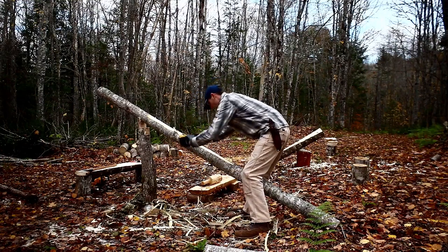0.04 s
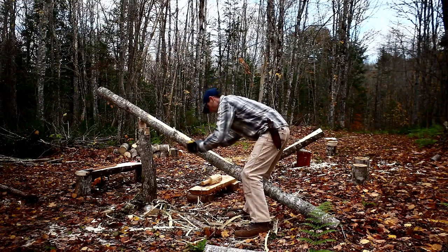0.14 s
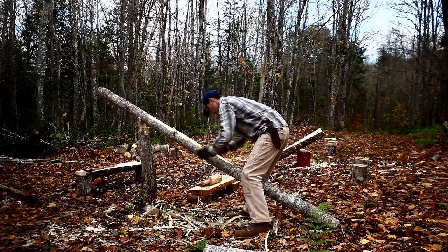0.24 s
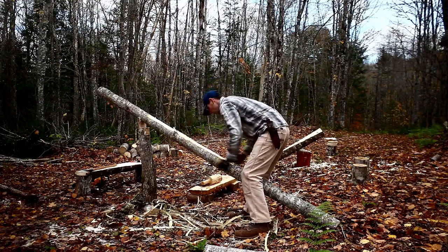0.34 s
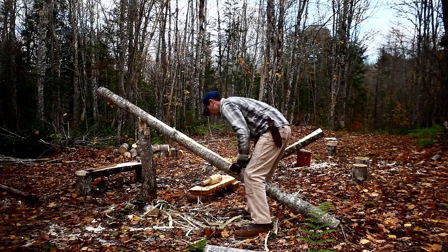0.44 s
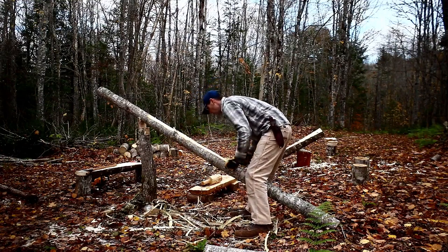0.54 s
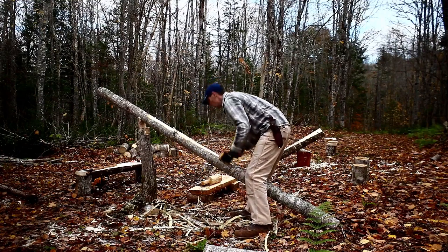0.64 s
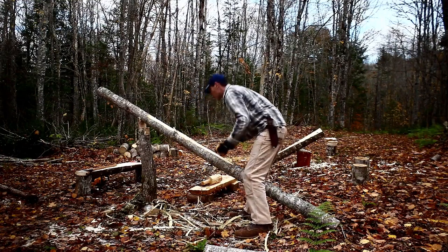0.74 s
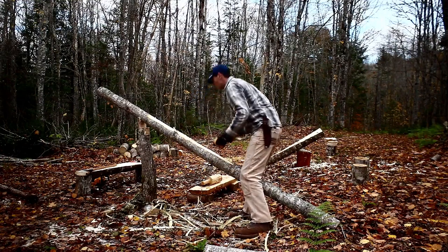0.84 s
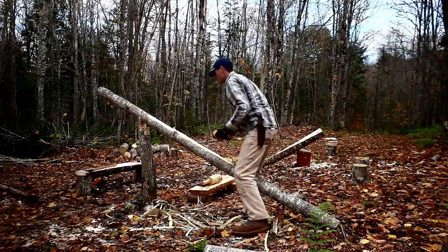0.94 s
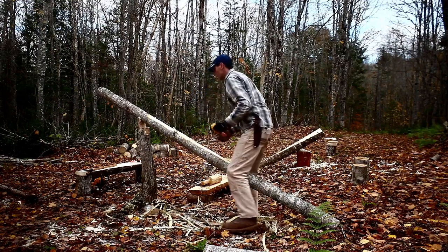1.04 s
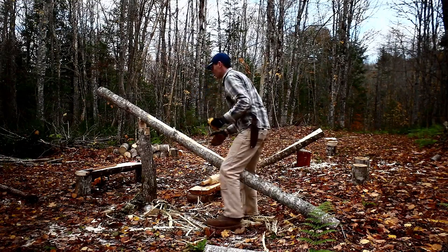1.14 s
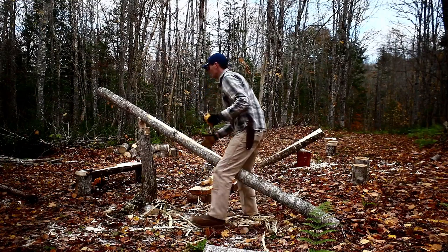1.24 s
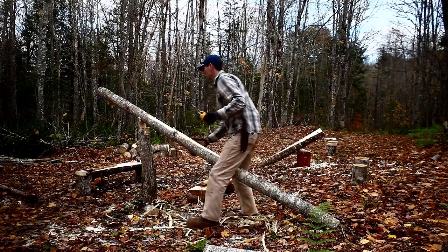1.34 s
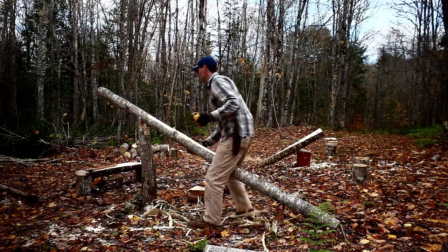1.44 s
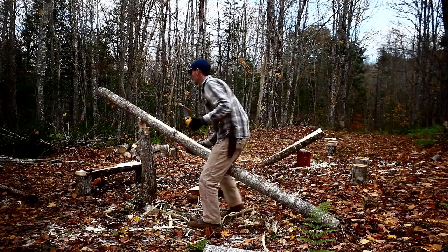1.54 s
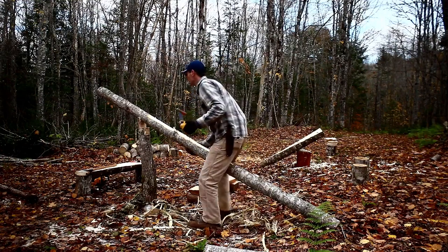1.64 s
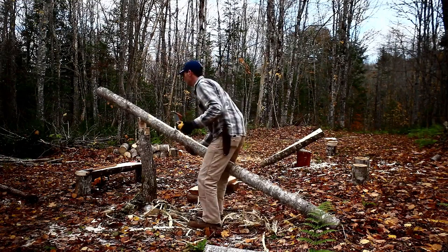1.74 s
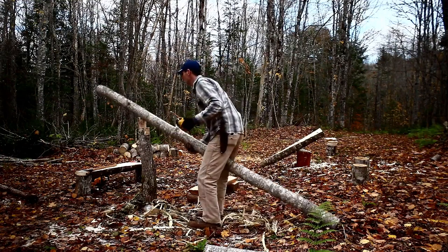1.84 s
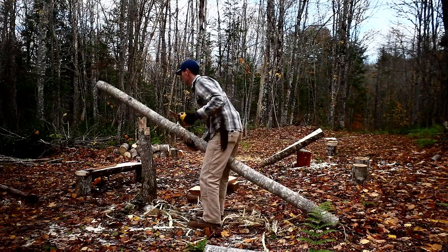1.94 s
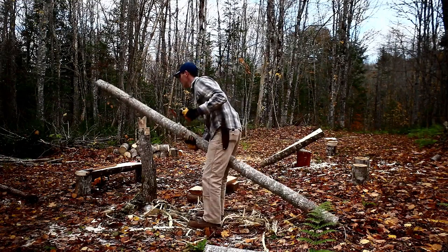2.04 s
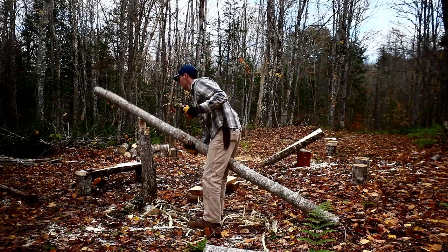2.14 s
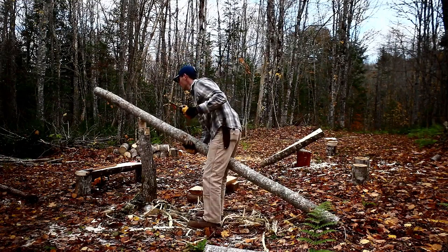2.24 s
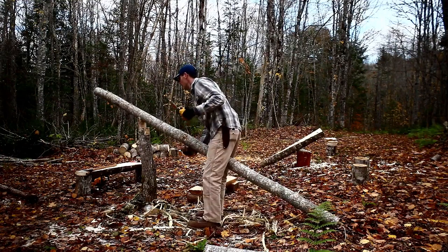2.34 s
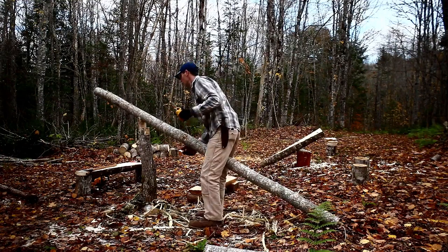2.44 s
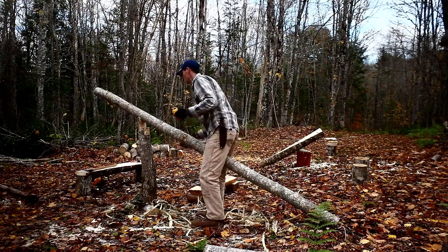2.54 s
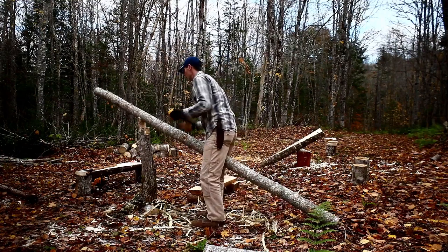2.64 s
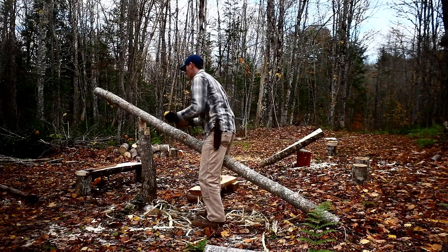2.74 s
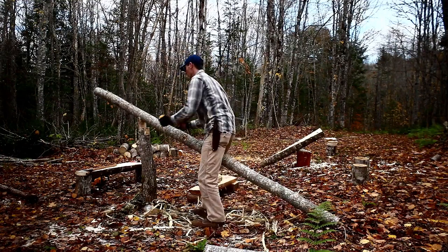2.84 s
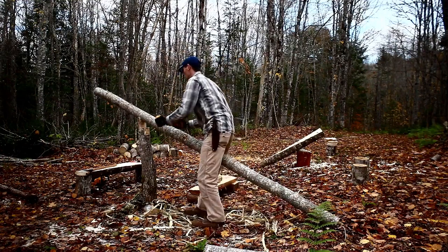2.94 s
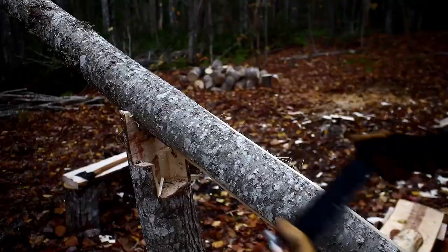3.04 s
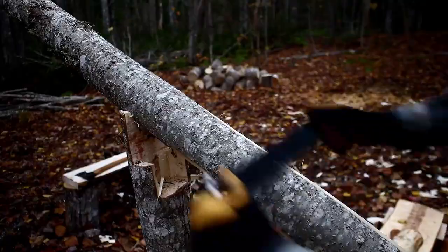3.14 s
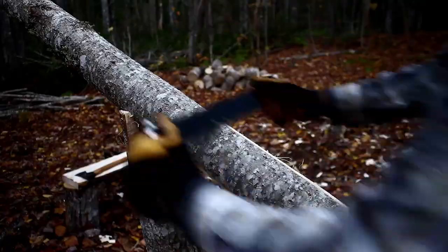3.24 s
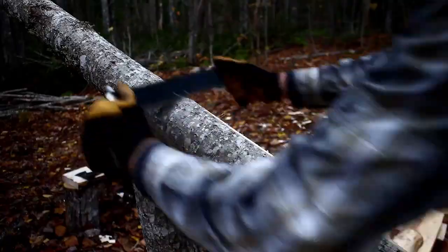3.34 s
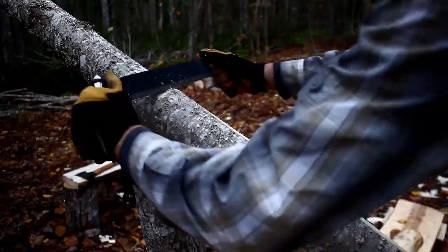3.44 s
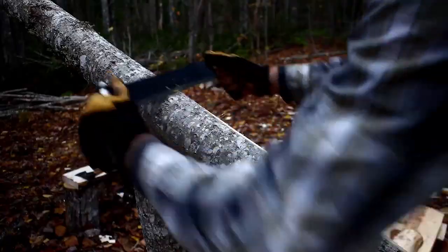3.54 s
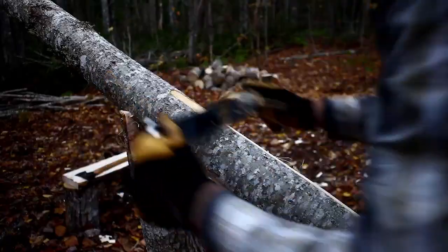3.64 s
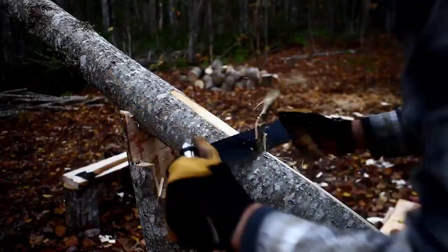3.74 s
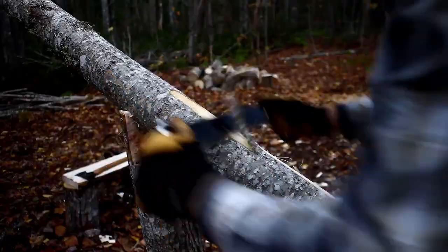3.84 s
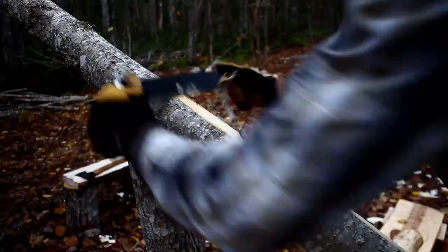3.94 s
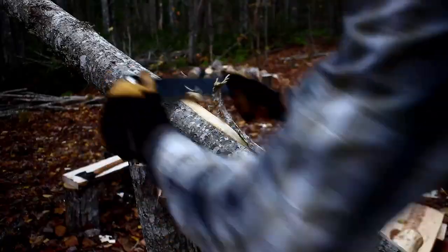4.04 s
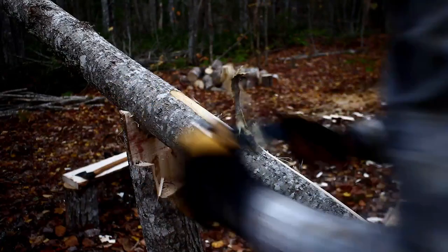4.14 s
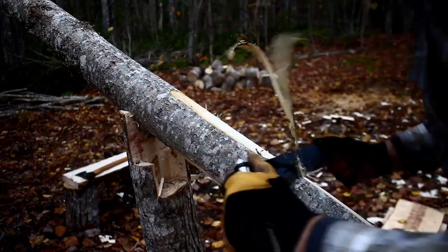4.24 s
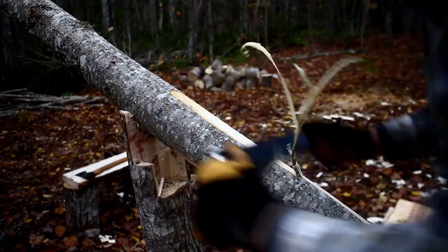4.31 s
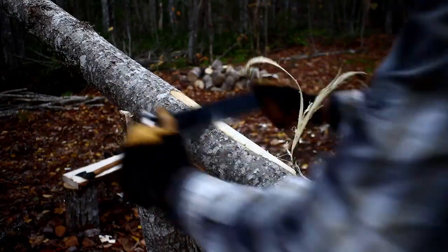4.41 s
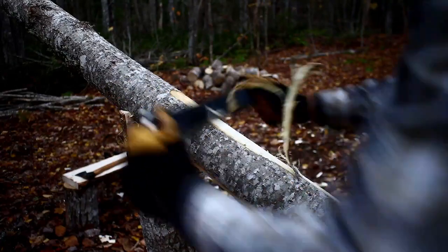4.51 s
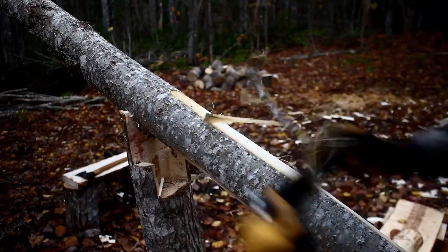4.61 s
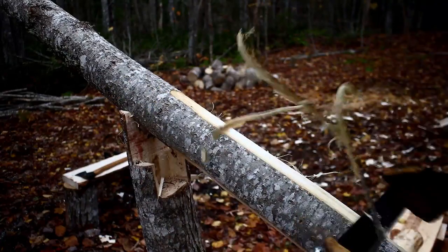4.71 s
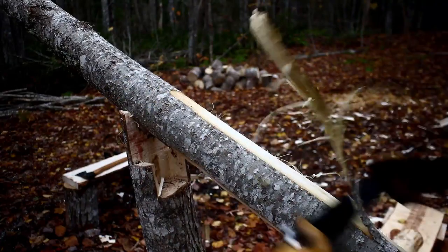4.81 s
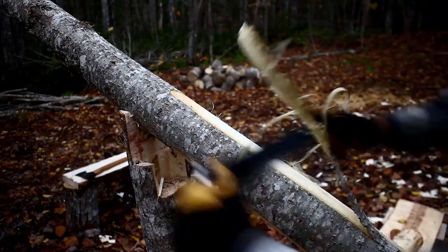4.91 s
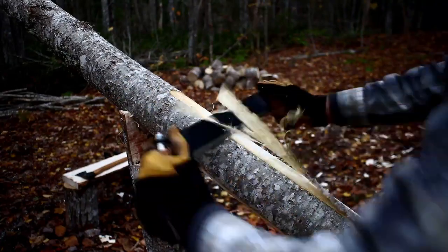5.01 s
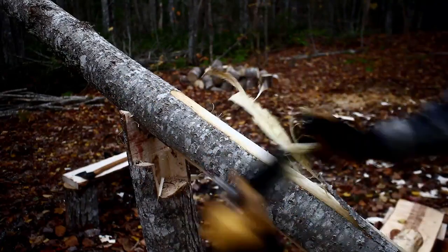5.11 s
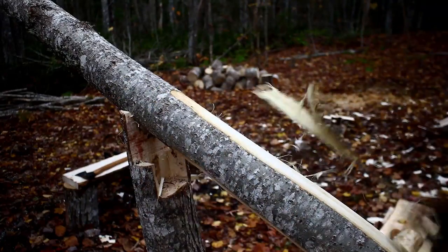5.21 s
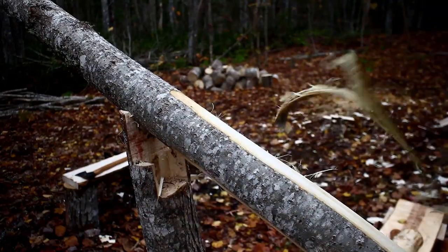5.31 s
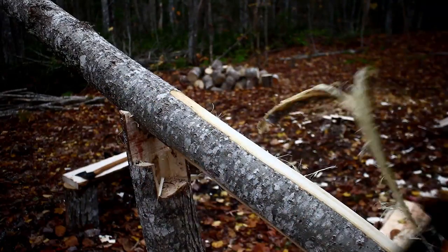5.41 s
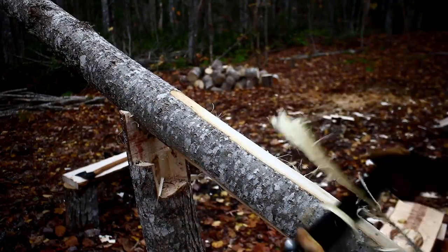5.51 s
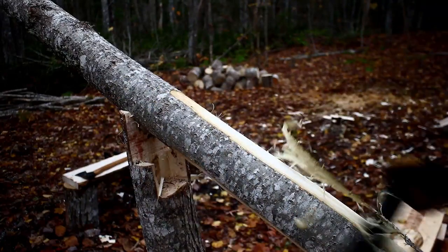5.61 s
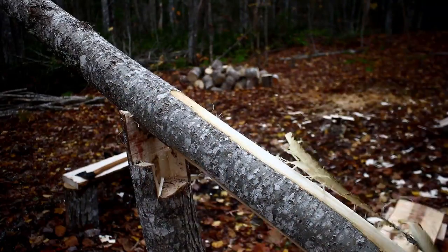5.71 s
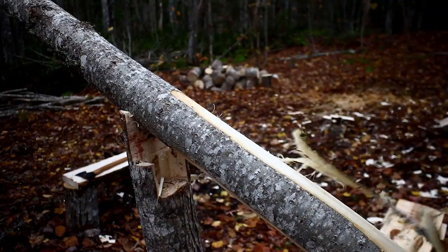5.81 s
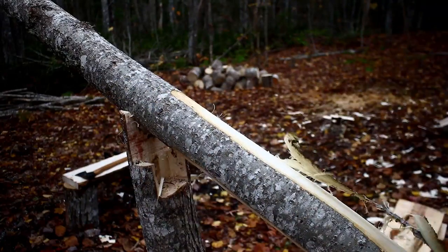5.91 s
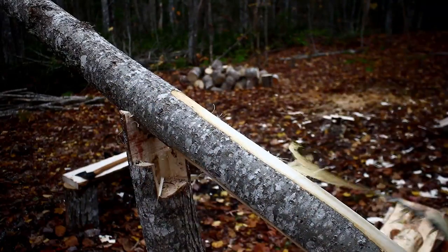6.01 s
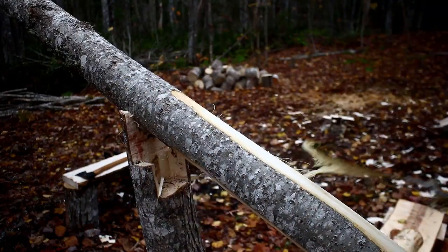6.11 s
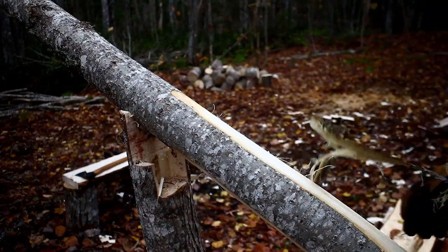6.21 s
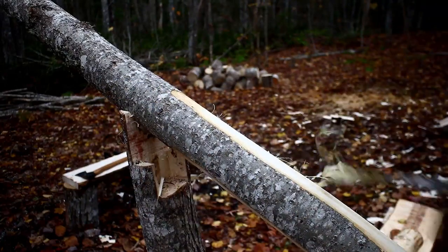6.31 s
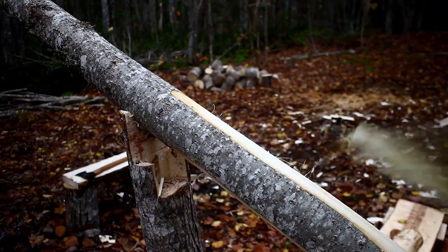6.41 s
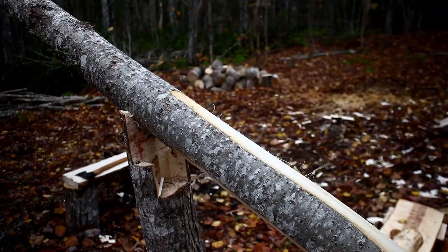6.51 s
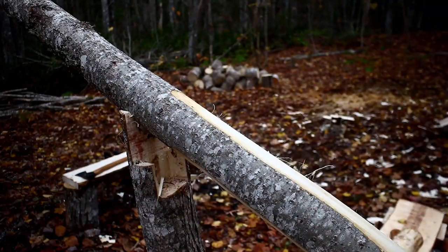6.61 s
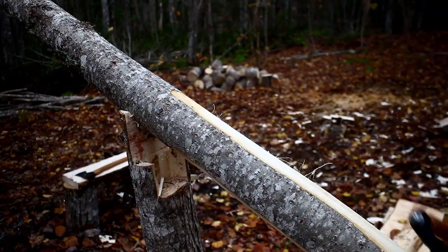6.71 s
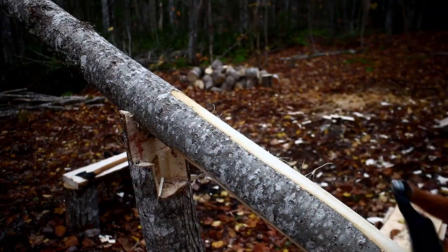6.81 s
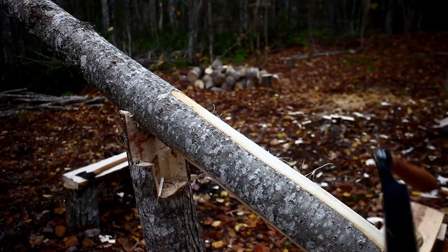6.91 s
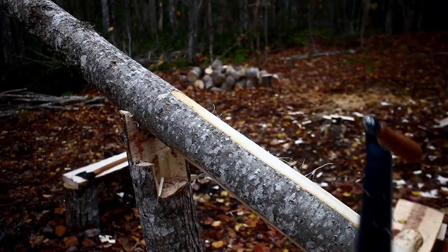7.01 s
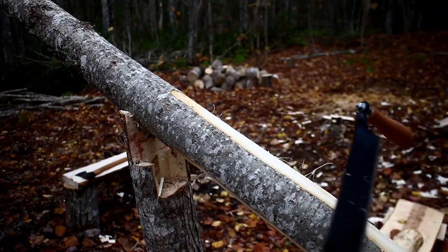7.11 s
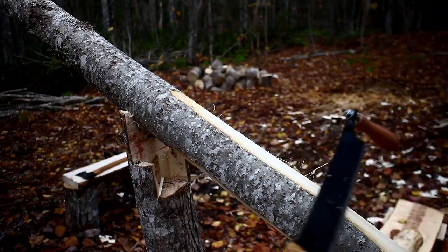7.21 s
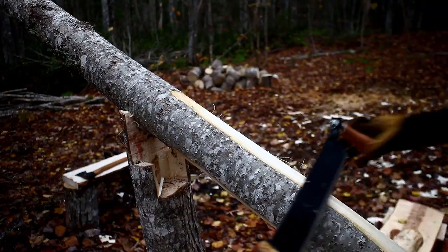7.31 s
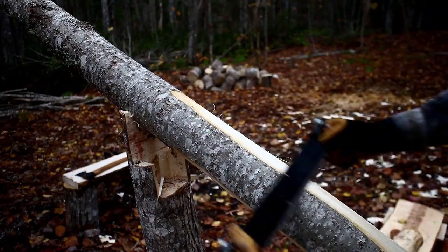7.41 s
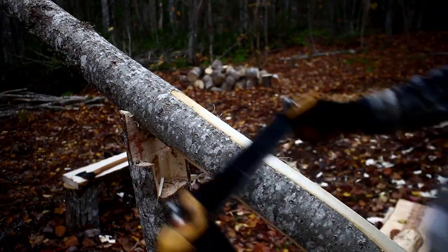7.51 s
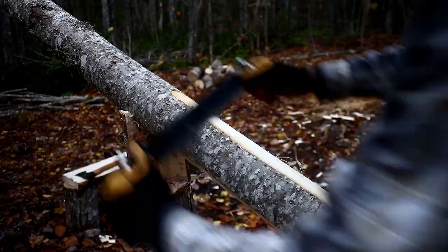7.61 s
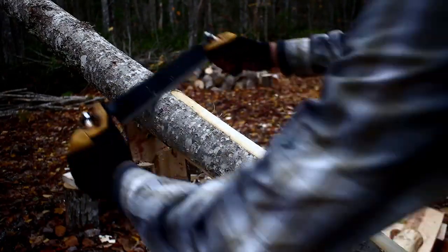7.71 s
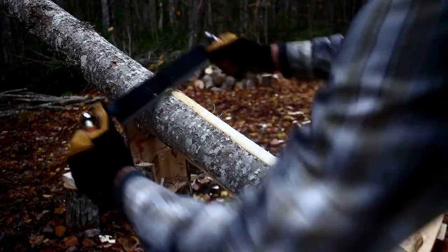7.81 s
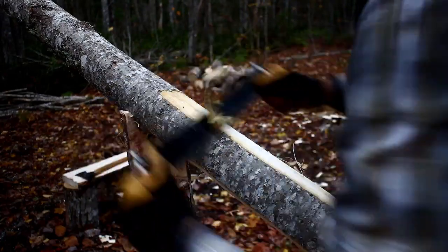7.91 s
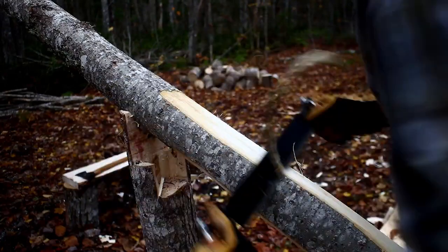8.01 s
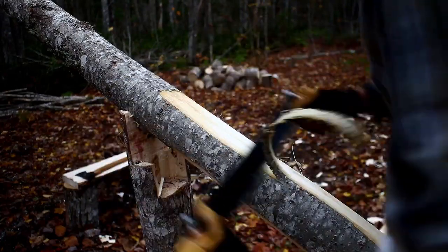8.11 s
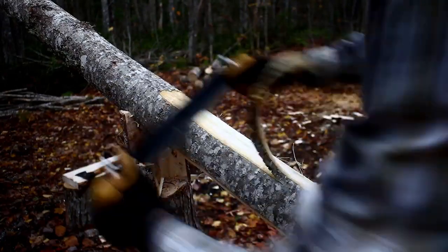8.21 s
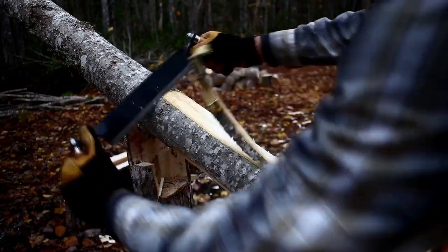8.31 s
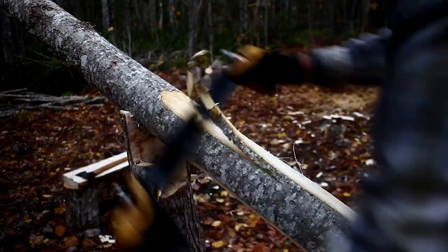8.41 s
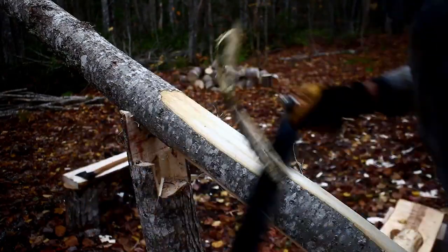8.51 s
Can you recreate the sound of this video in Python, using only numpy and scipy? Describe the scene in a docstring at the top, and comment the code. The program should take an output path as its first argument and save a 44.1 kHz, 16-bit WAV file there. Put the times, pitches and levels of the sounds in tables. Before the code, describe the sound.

In a still autumn wood, a drawknife rasps bark from a hollow-ringing pole in repeated strokes, first distant, then close, with crackling strips and rustling leaves.

```python
"""A drawknife is pulled along a propped pole and pushed back, in a still autumn wood; first from afar, then close.
Tearing bark fibres are noise and random clicks; they drive the wood modes of the pole and the steel modes of the blade.
Feet and falling bark strips rustle (clumped grains) and snap (short noise bursts) in dry leaves.
The knife taps and knocks the pole, which thumps on its prop with uneven bounces (decaying low modes)
and groans once (a sinking tone)."""
import sys
import numpy as np
from scipy import signal
from scipy.fft import rfft, irfft, next_fast_len
from scipy.io import wavfile
from scipy.ndimage import uniform_filter1d

SR = 44100
rng = np.random.default_rng(int(sys.argv[2]) if len(sys.argv) > 2 else 0)


def output_pcm(signal):
    """Save a mono or channel-first signal as 16-bit PCM at the path in sys.argv[1].

    Samples are clipped to [-1, 1] before scaling.
    """
    pcm = np.clip(np.atleast_2d(signal).T, -1, 1) * 32767
    wavfile.write(sys.argv[1], SR, np.round(pcm).astype(np.int16))


N = 377055

# wood modes of the pole: (frequency [Hz], width [Hz], relative level [dB])
POLE_MODES = [(514.6, 13, -5.5), (661, 23.3, 6), (713, 55, -2), (822.2, 12.4, 5.5), (917, 24, -0.5),
              (1079, 54, 3.5), (1211, 26, -2), (1316, 24.4, 3.5), (1472, 69, -4.5), (1726, 52, -1.5),
              (1950, 30, -22)]
# low hum of the pole: (frequency [Hz], width [Hz], relative level [dB])
HUM_MODES = [(402.4, 15, 0)]
# steel modes of the blade: (frequency [Hz], width [Hz], relative level [dB])
BLADE_MODES = [(4070, 89, 9), (4166, 24, -7), (4490, 55, -11), (8570, 380, -3.5)]


def from_db(db):
    """Gain of a level in dB."""
    return 10 ** (np.asarray(db) / 20)


def rms_one(x):
    """Scale to rms 1."""
    return x / np.sqrt(np.mean(x ** 2) + 1e-20)


def in_time(tables):
    """Columns of several tables laid out in time; the first column is silent between them."""
    out = np.zeros((len(tables[0][0]) - 1, N))
    out[0] = -130
    for rows in tables:
        s, *columns = np.transpose(rows)
        stop = min(int(s[-1] * SR) + 1100, N)   # last row held 25 ms, unless the next table takes over
        span = np.arange(int(s[0] * SR), stop)
        out[:, span] = [np.interp(span / SR, s, c) for c in columns]
    return uniform_filter1d(out, size=90, axis=1)


def colour(x, spectrum):
    """Give a white signal a spectrum (frequency [Hz], relative density [dB per Hz]); rms 1."""
    hz, db = np.transpose(spectrum)
    size = next_fast_len(N)
    bin_hz = np.arange(size // 2 + 1) * SR / size
    gain = from_db(np.interp(np.log(bin_hz + 1), np.log(hz), db, left=-90, right=-90))
    return rms_one(irfft(rfft(x, size) * gain, size)[:N])


def drift(rate_hz):
    """Slow random wander: noise through two equal low-pass poles at a 40-sample step; rms 1."""
    r = np.exp(-80 * np.pi * rate_hz / SR)
    noise = rng.standard_normal(N // 40 + 1002)
    slow = signal.lfilter([1], [1, -2 * r, r * r], noise)[1000:]
    return np.interp(np.arange(N) / 40, np.arange(len(slow)), rms_one(slow))


def grains(per_s, spread_db, hiss):
    """Random clicks of uneven size on a bed of friction noise; rms 1."""
    sizes = from_db(spread_db * np.minimum(rng.exponential(1, N), 4.2)) * rng.choice([-1, 1], N)
    clicks = rms_one(sizes * (rng.random(N) < per_s / SR))
    return rms_one(clicks + hiss * rng.standard_normal(N))


def resonate(x, modes, wander_db):
    """Parallel resonances, signs alternating; the moving contact shares the force anew among them; rms 1."""
    gains = np.array([from_db(db + wander_db * drift(6.1)) for hz, width, db in modes])
    widths = [width for hz, width, db in modes]
    gains /= np.sqrt(np.dot(widths, gains ** 2))
    out = 0
    for k, (hz, width, db) in enumerate(modes):
        r = np.exp(-np.pi * width / SR)
        b = (1 - r * r) / 2 * np.array([1, 0, -1])
        a = [1, -2 * r * np.cos(2 * np.pi * hz / SR), r * r]
        out = out + (-1) ** k * signal.lfilter(b, a, x * gains[k])
    return rms_one(out)


def ringing(gain, drive, modes, wander_db):
    """Modes driven by a shaped force, at the rms level of that force."""
    return resonate(gain * drive, modes, wander_db) * np.sqrt(np.mean(gain ** 2))


def cracks(events, spread, top_hz, click):
    """Each event is a click and a burst of noise that dies fast, with its own low, middle and high peak."""
    out, t = np.zeros(N + 4000), np.arange(4000) / SR
    noises = rng.standard_normal((len(events), 4000))
    for (s, middle_db, hz, low_db, high_db, t60_s), noise in zip(events, noises):
        decay = from_db(-60 * t / np.clip(t60_s, .002, .09))
        burst = (noise + click * np.sign(noise[0]) * (t == 0)) * decay
        bands = (([420, 1000], low_db), ([hz / spread, hz * spread], middle_db), ([6000, top_hz], high_db))
        for edges_hz, db in bands:
            part = signal.sosfilt(signal.butter(2, edges_hz, "band", fs=SR, output="sos"), burst)
            out[round(s * SR):][:4000] += from_db(db) * part / np.abs(part).max()
    return out[:N]


def still_air():
    """Faint forest air in both channels; the microphone hiss differs between them."""
    # common air, difference of the channels: (frequency [Hz], relative density [dB per Hz])
    mid_spectrum = [(18, -26), (30, 3), (336, -4.5), (569, -6), (760, -5.5), (1130, -9), (1320, -8.5),
                    (2900, -12), (8300, -13.5), (14800, -17), (16000, -16)]
    side_spectrum = [(18, -29), (30, 1), (70, -3), (345, -3), (404, -6), (473, -6), (13000, -11),
                     (16000, -13)]
    mid_db, side_db = -68.5, -72
    mid = from_db(mid_db + 0.76 * drift(3.2)) * colour(rng.standard_normal(N), mid_spectrum)
    side = from_db(side_db) * colour(rng.standard_normal(N), side_spectrum)
    return np.array([mid + side, mid - side])


def leaves():
    """Dry leaves crumple: clumped grains, a dull and a crisp part; each rustle rises, holds and fades."""
    # crumpling under feet and bark: (start [s], hold [s], dull level [dB], crisp level above dull [dB])
    rustles = [(0.653, 0.0068, -74.5, 9), (0.812, 0.0082, -66.5, -12), (0.904, .33, -70.5, 8),
               (1.287, 0.058, -65, -5), (1.346, 0.19, -72.5, 2.5), (1.618, 0.038, -64.5, -0.5),
               (2.082, 0.018, -59.5, -5.5), (2.375, 0.061, -70, -0.5), (2.504, .01, -79, -5),
               (2.65, 0.075, -66.5, -6), (2.823, .01, -68, 0), (2.89, 0.16, -66, 3),
               (3.035, 0.084, -59.5, -5.5), (5.775, 0.093, -62.5, -7), (5.866, 0.0068, -55, -12),
               (5.916, 0.071, -57.5, -4), (6.005, 0.18, -65, 4), (6.181, 0.025, -60, 6.5),
               (6.29, .003, -51.5, -7), (6.324, 0.091, -56.5, -2), (6.438, 0.089, -54, -3),
               (6.552, 0.074, -52, -5.5), (6.668, .03, -64, 6), (6.709, 0.014, -45.5, -7.5),
               (6.764, 0.015, -56, 0.5), (6.868, 0.0082, -64.5, -21), (6.926, .13, -74.5, -16),
               (7.115, 0.0077, -71, 0), (7.16, .16, -69.5, -8)]
    # dull and crisp spectrum: (frequency [Hz], relative density [dB per Hz])
    dull_spectrum = [(59, -14), (100, -10.5), (303, -5.5), (514, -1.5), (1030, -4.5), (1820, -12),
                     (3000, -20.5), (3900, -41), (6600, -120)]
    crisp_spectrum = [(1180, -14), (2000, -5), (4530, -2.5), (5300, -4), (6800, -6), (8200, -2), (9800, -9),
                      (15100, -17), (16000, -13)]
    rise_s, rise_db_per_s, fall_db_per_s = 0.016, 600, 315   # slopes for zero hold
    slower_per_s_held = 3.7   # long rustles swell and fade more gently
    far_clump_db, near_clump_db, close_from_s = 1.76, 2.5, 3.2   # distance evens out the clumps

    t, dull, crisp = np.arange(N) / SR, np.zeros(N), np.zeros(N)
    for s, hold, db, crisp_db in rustles:
        span = slice(int((s - .1) * SR), int((s + hold + .4) * SR))
        top = s + rise_s
        loss_db = np.maximum(rise_db_per_s * (top - t[span]), fall_db_per_s * (t[span] - top - hold))
        power = from_db(db - np.maximum(loss_db, 0) / (1 + slower_per_s_held * hold)) ** 2
        dull[span] += power
        crisp[span] += power * from_db(crisp_db) ** 2
    clump_db = np.where(t < close_from_s, far_clump_db, near_clump_db) * drift(37)
    crumple = from_db(clump_db) * grains(1500, spread_db=5.5, hiss=1.7)
    return np.sqrt(dull) * colour(crumple, dull_spectrum) + np.sqrt(crisp) * colour(crumple, crisp_spectrum)


def snaps_and_taps():
    """Twigs and bark strips break; at 5.878 s the knife taps the pole, at 6.533 s a short dull knock."""
    # (time [s], middle peak [dB], middle frequency [Hz], low peak [dB], high peak [dB])
    bursts = [(.6667, -47, 5920, -73, -48), (.682, -56, 4380, -74, -46), (2.9314, -41.5, 2880, -60, -62),
              (2.9906, -51, 3060, -69, -40), (3.024, -42, 3210, -65, -51), (5.7544, -43, 1680, -49, -52),
              (5.77, -42, 4310, -61, -59), (5.7927, -40.5, 2940, -60, -64), (5.878, -27, 4070, -39.5, -36),
              (5.9726, -42, 3060, -49, -42), (6.2583, -39, 4870, -52, -29), (6.2924, -24.5, 2150, -42, -26),
              (6.3017, -29, 4330, -34, -24.5), (6.3889, -32.5, 4150, -54, -51),
              (6.402, -36, 3970, -61, -59), (6.426, -42, 1490, -49, -56), (6.5327, -34.5, 1230, -24, -54),
              (6.554, -39, 1240, -57, -58), (6.8157, -38, 3440, -60, -63), (6.906, -49, 1950, -72, -71),
              (7.0405, -39, 1990, -49, -62), (7.1285, -48.5, 1220, -67, -63),
              (7.1592, -45.5, 2210, -59, -65)]
    # the loud ones ring longer; cracks() caps the t60
    base_t60_s, longer_above_db, t60_s_per_db = 0.022, -32.5, 0.2
    middle_db = np.array(bursts)[:, 1]
    t60_s = base_t60_s + t60_s_per_db * np.maximum(middle_db - longer_above_db, 0)
    return cracks(np.c_[bursts, t60_s], spread=1.9, top_hz=10400, click=8.3)


def knocks():
    """A short blow of the knife rings the modes of pole and blade."""
    # (time [s], pole level [dB], hum above pole [dB], blade above pole [dB])
    hits = [(.312, -50, 7.5, -25), (.342, -52, 11, -25), (4.835, -34.5, 2, -22), (4.897, -30.5, 4, -20),
            (5.8791, -36, -11, -7), (7.331, -47.5, 4, -20), (7.521, -34, -2, -25)]
    out = np.zeros(N)
    s, db, hum_db, blade_db = np.transpose(hits)
    for levels_db, modes in ((db, POLE_MODES), (db + hum_db, HUM_MODES), (db + blade_db, BLADE_MODES)):
        blows = np.full(N, 1e-18)
        blows[(s * SR).astype(int)] = from_db(levels_db)
        ring = resonate(blows, modes, wander_db=3.0)
        out += ring / np.abs(ring).max() * from_db(levels_db.max())
    return out


def thump():
    """A faint touch, then a blow and uneven, fading bounces ring the low modes of pole and prop."""
    # pole touching and bouncing on its prop: (time [s], level before trim [dB])
    bounces = [(2.093, -49), (2.103, -31), (2.121, -36.5), (2.159, -41.5), (2.171, -37.5), (2.242, -47),
               (2.309, -53)]
    # modes of pole and prop: (frequency [Hz], relative level [dB], t60 [s])
    prop_modes = [(57, -6.5, 0.3), (82, -7, 0.3), (122, 2.5, 0.063), (207, -8, 0.079), (303, -14.5, 0.11),
                  (535, -11, 0.15), (1064, -14, 0.062), (1340, -7, 0.022), (1620, -15, .04)]
    trim_db = -9.5
    clicks = np.full(N, 1e-18)
    clicks[[round(s * SR) for s, db in bounces]] = from_db([db + trim_db for s, db in bounces])
    out = 0
    for hz, db, t60_s in prop_modes:
        r, w = from_db(-60 / (t60_s * SR)), 2 * np.pi * hz / SR
        out = out + from_db(db) * signal.lfilter([0, np.sin(w)], [1, -2 * r * np.cos(w), r * r], clicks)
    return out


def groan():
    """A nearly pure tone with a slight waver sinks as one pull ends."""
    # (time [s], pitch before waver [Hz], rms level [dB])
    contour = [(5.165, 252, -63), (5.18, 250, -42), (5.22, 256, -44), (5.245, 223, -51), (5.27, 185, -77)]
    s, hz, db = np.transpose(contour)
    t = np.arange(N) / SR
    pitch_hz = np.interp(t, s, hz) * (1 + 0.027 * drift(33))
    phase = 2 * np.pi * np.cumsum(pitch_hz) / SR
    level_db = np.interp(t, s, db, left=-130, right=-130)
    return np.sqrt(2) * from_db(level_db) * np.sin(phase)


def patchy(x, patchy_db):
    """The colour wanders as the bark strip grows and curls: five wide bands swell and sink a little."""
    edges_hz = np.geomspace(1500, 9500, 6)
    bands = [signal.sosfilt(signal.butter(1, pair, "band", fs=SR, output="sos"), x)
             for pair in zip(edges_hz, edges_hz[1:])]
    return rms_one(x + patchy_db / 10 * sum(band * drift(50) for band in bands))


def stroke_levels():
    """Force and bite of each stroke, with its grip, set the level of every part."""
    # one table per pull or return, levels before the trims in knife():
    # (time [s], force [dB], bite as crackle above force [dB], blade above force [dB])
    pressure = [
        [(0.0, -63.5, -10, -13), (0.092, -57.5, -12, -21), (0.206, -64.5, -7, -13.5), (0.262, -60, -3, -14.5),
         (0.304, -42, -13, -10.5), (0.324, -50.5, -36.5, -26), (0.364, -55, -46, -29), (0.46, -84, -19, -13)],
        [(3.19, -74, -16, 4), (3.216, -34, -20.5, -0.5), (3.234, -55.5, -39, -5), (3.258, -70, -16, -20),
         (3.268, -68, -14, 1), (3.282, -42, -19, -7.5), (3.346, -58, -24.5, -3), (3.43, -69, -18, -20)],
        [(3.44, -62.5, -28, -21), (3.488, -37, -6.5, 8), (3.516, -30, -2, -5), (3.552, -34.5, -1, 14),
         (3.612, -36, -6, 0.5), (3.65, -45, 1, 9), (3.692, -52, -15.5, -10), (3.72, -81, -8, -15)],
        [(3.72, -63, -2, -2.5), (3.752, -56.5, -6.5, -10), (3.812, -54.5, -11, -13), (3.86, -37.5, -9.5, 2.5),
         (3.9, -39.5, -18, 4.5), (3.92, -48, -26, -12), (3.932, -62, -29.5, -14.5), (3.94, -54, -5, -5)],
        [(3.94, -51, -10, -6), (3.948, -39.5, -18, -6), (3.988, -36.5, -0.5, 7), (4.022, -40.5, -1, 10),
         (4.054, -49.5, -8, -3), (4.084, -55.5, 0, 7.5), (4.1, -46, 3, 0)],
        [(4.1, -54.5, -6, 0), (4.12, -35, -8.5, -10.5), (4.126, -35.5, -14, -7.5), (4.162, -47, -4, 5),
         (4.174, -49, -11.5, -6), (4.188, -56, -34, -12.5), (4.196, -68, -18, -20), (4.21, -65.5, -18, -8)],
        [(4.21, -60.5, -21.5, -4), (4.22, -48, -27, -5), (4.258, -48, -17, -2.5), (4.268, -44, -24, -12),
         (4.276, -46.5, -23.5, -3), (4.382, -42, -24, -1), (4.416, -61.5, -20.5, -7), (4.43, -49, -13.5, -1)],
        [(4.43, -47, -24, -4), (4.464, -33, -21, -10.5), (4.48, -35, -9, 11.5), (4.544, -31.5, -5, 7),
         (4.658, -43, -6.5, 0), (4.684, -55, -31.5, -10), (4.702, -64, -14, -12), (4.72, -69, -13, 3)],
        [(4.72, -56, -15, 2), (4.742, -45.5, -29.5, -7), (4.87, -33, -24.5, -0.5), (4.88, -56, -1.5, 13.5),
         (4.898, -33.5, -29.5, -2), (4.914, -42, -17, 5), (4.944, -42.5, -35.5, -14), (4.96, -74, -6, -7)],
        [(4.96, -57, -15, -1), (4.99, -35.5, -23.5, 6), (5.062, -36.5, -6, 6.5), (5.124, -38, -4.5, 7.5),
         (5.152, -31.5, -3, 7), (5.21, -34.5, -8.5, -3.5), (5.236, -61, -28.5, -8), (5.26, -61, -4, -6)],
        [(5.26, -57, -11.5, -2), (5.352, -44, -27.5, -8), (5.364, -37, -29, -14), (5.384, -48, -18, -3.5),
         (5.392, -35, -35, -15.5), (5.426, -41.5, -34, -2.5), (5.474, -52, -29, -5.5), (5.5, -76, -11, -4)],
        [(5.5, -54, -15.5, 2.5), (5.552, -31, -21, 0), (5.57, -35, -12, 12.5), (5.654, -37, -4.5, -2),
         (5.692, -32, -9.5, -8), (5.702, -37, -25, -12.5), (5.728, -60, -28, -25), (5.76, -60, -13, -4.5)],
        [(7.32, -67, -5.5, -5), (7.334, -48.5, -30, -18), (7.346, -54.5, -14, -7.5), (7.368, -53, -27, -11),
         (7.384, -48.5, -14.5, -14), (7.406, -68, -25, -13), (7.414, -64, -24, -24), (7.43, -70, -14, -7)],
        [(7.43, -68.5, -15, -5), (7.444, -44, -23, -20), (7.514, -44.5, -22, -11), (7.52, -40, -20.5, -16.5),
         (7.586, -37.5, -25.5, -26), (7.622, -39.5, -25, -23), (7.698, -53, -28, -30), (7.72, -76, -11, -16)],
        [(7.72, -51, -25, -15), (7.744, -39.5, -8, -19), (7.79, -30, -4.5, -18), (7.88, -34.5, -3, -1),
         (7.902, -39.5, 2.5, -1), (7.972, -41, -6.5, -15.5), (8.0, -58.5, -22.5, -20), (8.01, -57, -17, -18)],
        [(8.01, -66, -11.5, -12), (8.036, -47.5, -22.5, -16), (8.068, -43, -14.5, -7.5),
         (8.084, -40.5, -14.5, -16.5), (8.162, -35.5, -19, -13.5), (8.178, -39.5, -14.5, -11),
         (8.226, -39, -30.5, -25.5), (8.26, -59, -18, -21)],
        [(8.26, -56.5, -18, -20), (8.268, -41.5, -17, -20), (8.292, -32, -12, -22.5), (8.336, -34, -4, -14.5),
         (8.458, -40, -5, -10), (8.478, -35, -11.5, -21), (8.52, -63, -15.5, -12), (8.55, -66.5, 9, -9)],
    ]
    # one row per stroke, above force, before bite and trims: (deep pole [dB], pole hum [dB], tearing [dB],
    # low blade twist [dB], middle blade twist [dB], high blade twist [dB])
    grips = [(-11, -11, 5.5, -16, -24, -21), (-4, -9, 2, -14, -20, -16.5),
             (-9, -14.5, 2.5, -11, -19, -13.5), (-7.5, -9, 2.5, -14.5, -10, -15.5),
             (-7.5, -21, -0.5, -12, -15, -19), (-8, -5, 4, -20, -23, -23.5), (-8, -7, 7.5, -19.5, -23, -31),
             (-12, -10.5, 4.5, -12, -15, -28), (-10.5, -10, 6, -14, -10.5, -22),
             (-10.5, -11.5, 5, -10, -11.5, -10), (-10.5, -8, 4.5, -15, -9.5, -14.5),
             (-15, -16, 3, -18, -18, -17.5), (1.5, 0, 9.5, -22, -19, -26), (-5, -4, 3.5, -21, -20.5, -27),
             (-9.5, -16, 3, -20.5, -24, -26), (-12, -6.5, 6, -15, -15.5, -24),
             (-11.5, -11.5, 4, -14, -24, -24.5)]
    mean_force_db, mean_bite_db = -45, -12
    # dB per dB of bite: a deeper bite tears and rings brighter
    tear_per_bite, twist_per_bite, deep_per_bite, sheen_per_bite = 0.53, 0.25, -.1, 0.36
    lows_per_force = -0.11   # the deep modes swing less than the force

    tables = [np.c_[rows, np.tile(grip, (len(rows), 1))] for rows, grip in zip(pressure, grips)]
    force_db, bite_db, blade_db, deep_db, hum_db, tear_db, *twists_db = in_time(tables)
    bite = bite_db - mean_bite_db
    lows_db = lows_per_force * np.clip(force_db - mean_force_db, -30, 30) + deep_per_bite * bite
    return (force_db, deep_db + lows_db, hum_db + lows_db, tear_db + tear_per_bite * bite,
            sheen_per_bite * bite, blade_db, [db + twist_per_bite * bite for db in twists_db], bite_db)


def knife():
    """The edge judders over rough bark; the same tearing shakes pole and blade."""
    # edge catches, a fibre bundle breaks:
    # (time [s], middle peak [dB], middle frequency [Hz], low peak [dB], high peak [dB])
    catch_rows = [(0.2602, -42.5, 2160, -47, -47), (0.302, -38, 1240, -40.5, -35),
                  (3.2034, -33.5, 4070, -40.5, -43), (3.2772, -44, 1380, -35, -38.5),
                  (3.489, -27, 4070, -34, -16.5), (3.5441, -22.5, 4000, -28, -10.5),
                  (3.5965, -20, 4080, -29.5, -16.5), (3.6121, -18, 4080, -32, -39),
                  (3.7402, -48, 1340, -52, -57), (3.952, -32, 4130, -30.5, -25),
                  (4.119, -37, 1340, -49, -17.5), (4.4557, -24, 4170, -38, -38),
                  (4.4843, -19, 4070, -49.5, -44), (4.5037, -23.5, 4000, -41, -33),
                  (4.5374, -35.5, 4170, -38.5, -26), (4.554, -20, 4070, -42.5, -25),
                  (4.9811, -32, 3800, -35, -48), (5.1341, -20.5, 3970, -28, -16),
                  (5.567, -35, 4170, -31, -37), (5.6244, -24, 1174, -37.5, -13.5),
                  (5.688, -14, 4420, -30.5, -10.5), (7.3367, -48, 1590, -46.5, -59),
                  (7.3791, -44, 3640, -42.5, -49), (7.4476, -41, 2180, -36, -60),
                  (7.5363, -28.5, 1450, -27, -38), (7.611, -38, 1450, -27.5, -34),
                  (7.7398, -49, 2690, -35, -28), (7.7864, -37, 1340, -36, -11.5),
                  (7.8755, -25, 1340, -48, -16), (7.956, -38, 1340, -35.5, -22),
                  (8.2728, -34, 1550, -32.5, -28), (8.293, -32, 2960, -56, -23),
                  (8.3347, -24, 2260, -49, -33), (8.523, -38, 3500, -55.5, -45)]
    # deep pole modes: (frequency [Hz], width [Hz], relative level [dB])
    deep_modes = [(53.7, 29, -11), (130.5, 11.4, -1), (214.4, 44, -4.5), (293.3, 22.2, 3)]
    # blade twisting, low, middle and high group: (frequency [Hz], width [Hz], relative level [dB])
    twist_groups = [
        [(2266, 100, -3), (2690, 65, 5), (2810, 60, -2)],
        [(3620, 75, 5.5), (5400, 160, -6)],
        [(6165, 65, 5), (6500, 60, -8)],
    ]
    # tearing and crackle spectrum: (frequency [Hz], relative density [dB per Hz])
    tear_spectrum = [(250, -11), (500, -10), (1300, -6.5), (2500, -4.5), (4000, -11), (6000, -8.5),
                     (7400, -10), (8100, -6), (8800, -8.5), (9300, -13), (10200, -24.5), (13000, -41)]
    crackle_spectrum = [(7500, -11), (8100, 6.5), (9300, -2.5), (12000, 4.5), (16000, -1.5)]
    catch_t60_s, sheen_hz = 0.0096, 6500
    twist_flicker_db = 3.5   # twist rings flare and fade as the hands shift

    force_db, deep_db, hum_db, tear_db, sheen_db, blade_db, twists_db, crackle_db = stroke_levels()
    force = from_db(force_db)
    judder = from_db(0.71 * drift(66) + 1.05 * drift(220))
    fibres = rms_one(judder * grains(4000, spread_db=4.0, hiss=1.0))
    splinters = rms_one(judder * grains(4000, spread_db=14.0, hiss=1.7))
    catches = cracks([(*row, catch_t60_s) for row in catch_rows], spread=1.198, top_hz=10560, click=5.0)

    # a catch also strikes pole and blade; the division largely undoes the force gain in ringing()
    jolt = from_db(-8) * catches
    drive = fibres + jolt / (force + from_db(-59))
    # (level above force [dB], modes, wander [dB])
    parts = [(-1.5, POLE_MODES, 2.8), (deep_db, deep_modes, 3.0),
             (hum_db, HUM_MODES, 0), (blade_db - 3.0, BLADE_MODES, 1.5)]
    for db, modes in zip(twists_db, twist_groups):
        parts.append((db + 2.0 + twist_flicker_db * drift(11), modes, 3.0))
    # the level shapes the force, so that the modes ring on after it stops
    rings = sum(ringing(force * from_db(db), drive, modes, wander_db) for db, modes, wander_db in parts)

    # a shallow bite loses the top of the tearing first
    tear = patchy(colour(fibres, tear_spectrum), patchy_db=2.0)
    body = signal.sosfilt(signal.butter(1, sheen_hz, fs=SR, output="sos"), tear)
    tearing = from_db(tear_db - 6.5) * (body + from_db(sheen_db) * (tear - body))
    crackle = from_db(crackle_db) * colour(splinters, crackle_spectrum)
    return rings + force * (tearing + crackle) + catches


def scene():
    """Everything near reaches both channels alike."""
    return still_air() + leaves() + snaps_and_taps() + knocks() + thump() + groan() + knife()


def record(dry):
    """The microphone loses the deepest bass; the top is cut."""
    low_cut_hz, top_cut_hz = 32, 15930
    dry = signal.sosfilt(signal.butter(2, low_cut_hz, "high", fs=SR, output="sos"), dry)
    return signal.sosfilt(signal.ellip(12, .2, 75, top_cut_hz, fs=SR, output="sos"), dry)


dry = scene()
out = record(dry)
output_pcm(out)
```